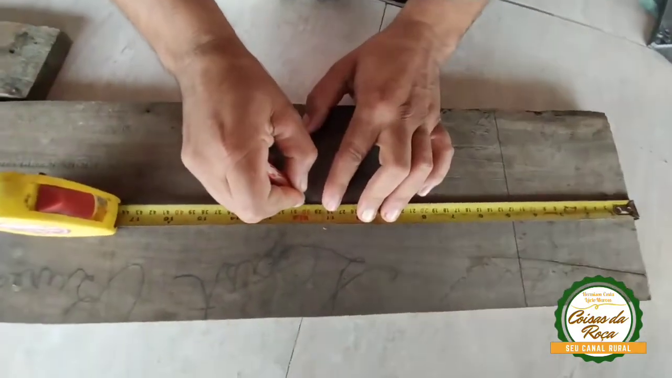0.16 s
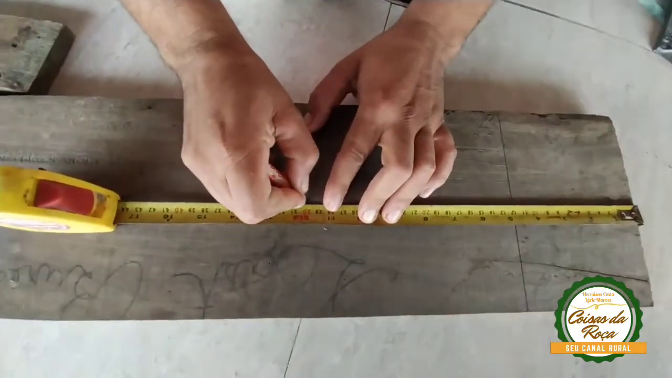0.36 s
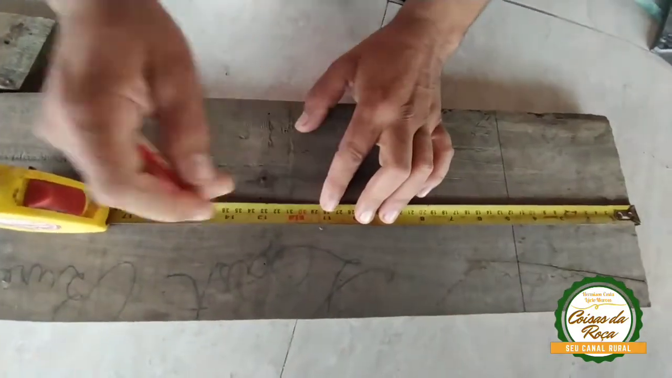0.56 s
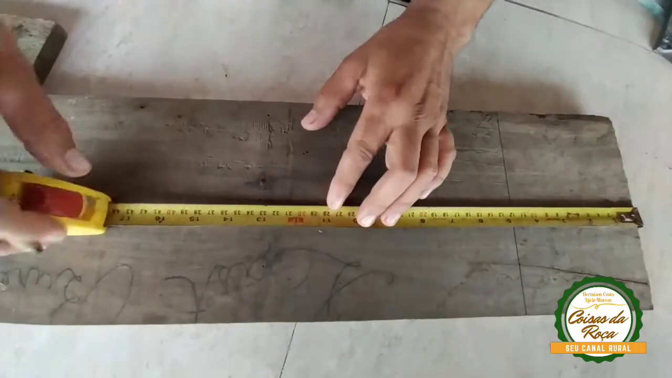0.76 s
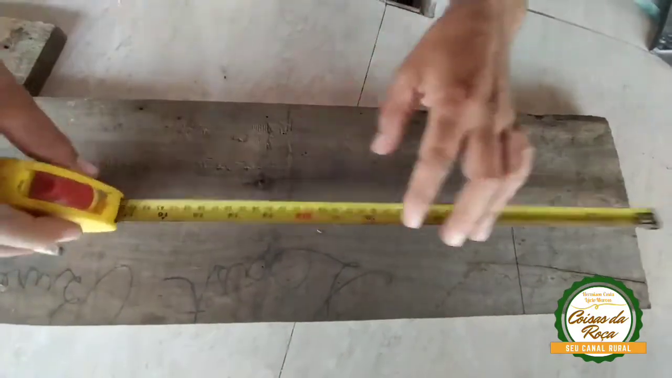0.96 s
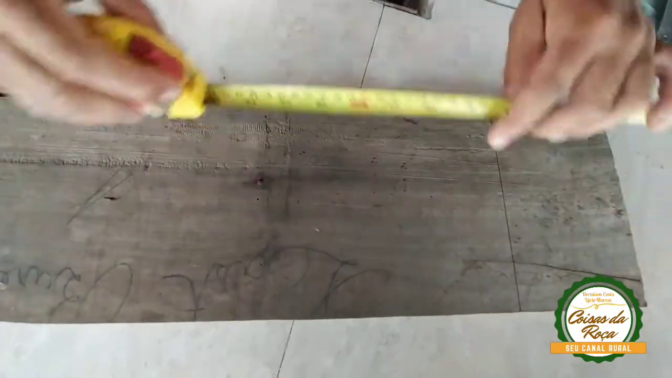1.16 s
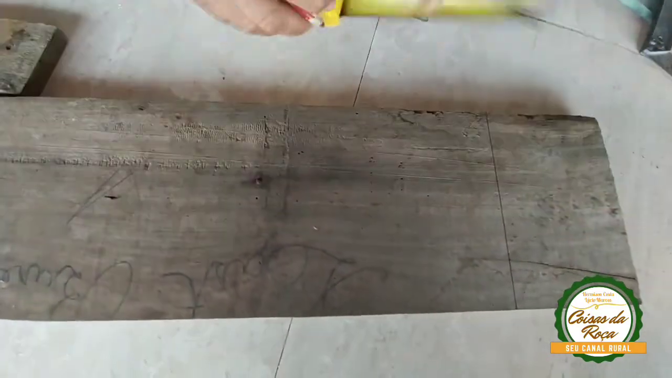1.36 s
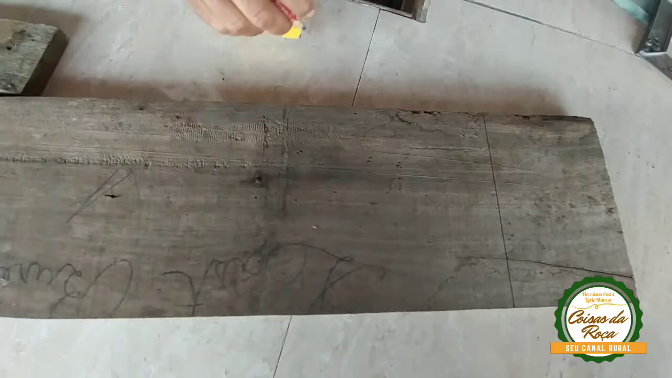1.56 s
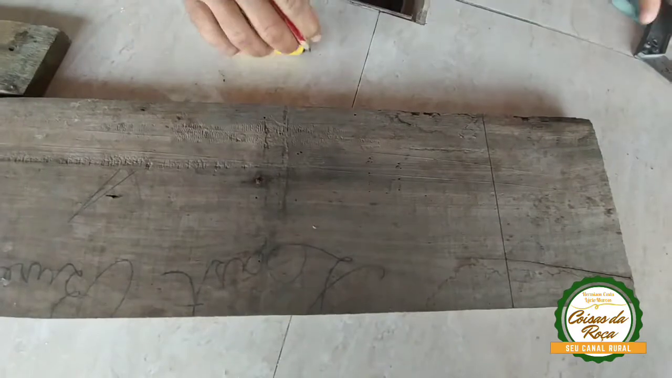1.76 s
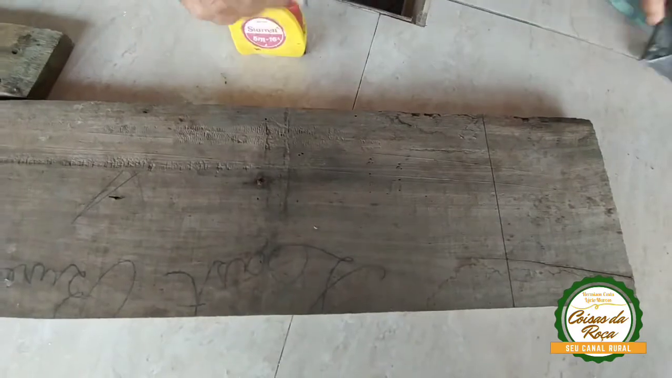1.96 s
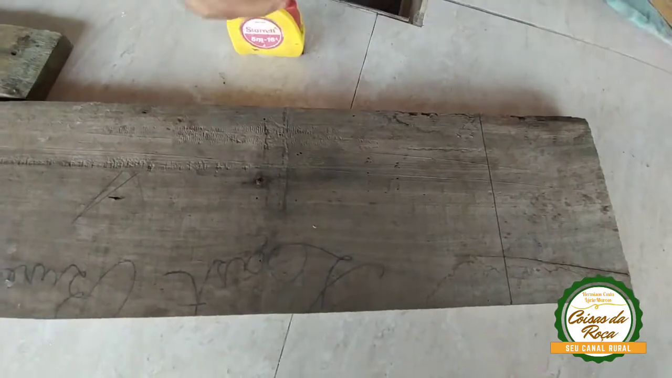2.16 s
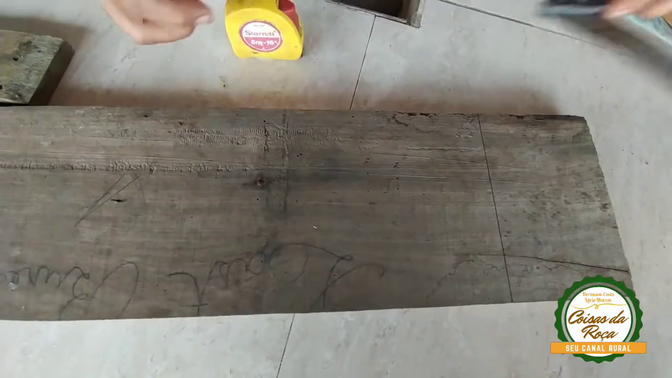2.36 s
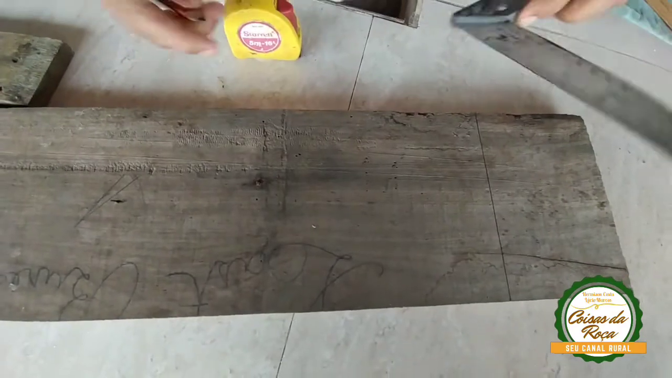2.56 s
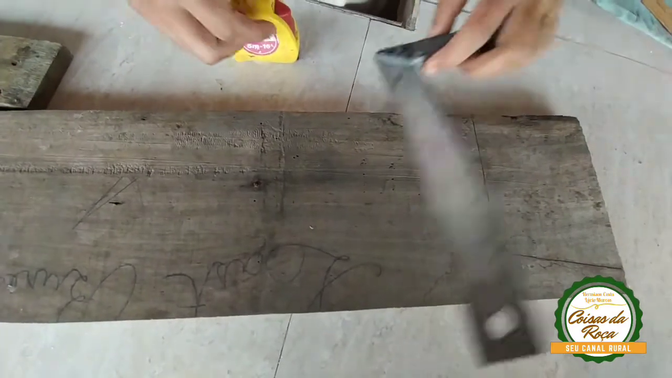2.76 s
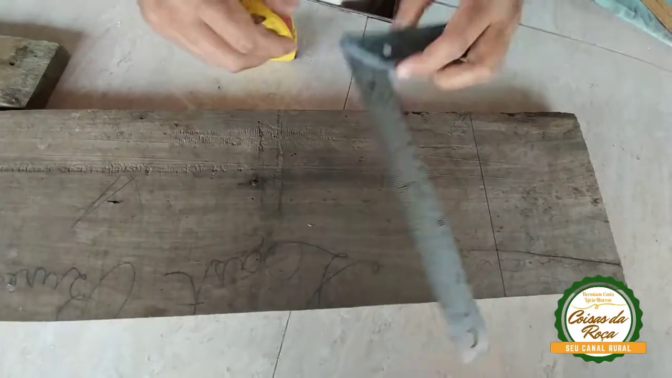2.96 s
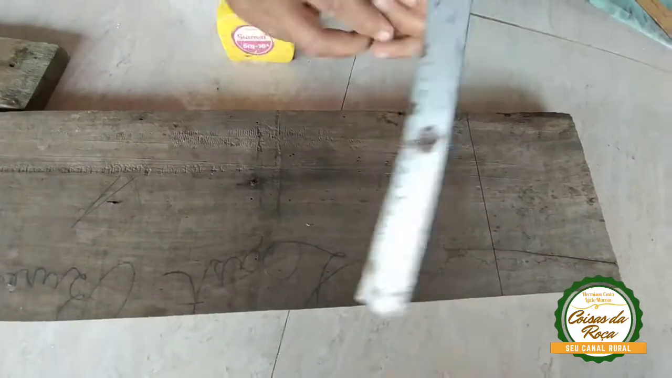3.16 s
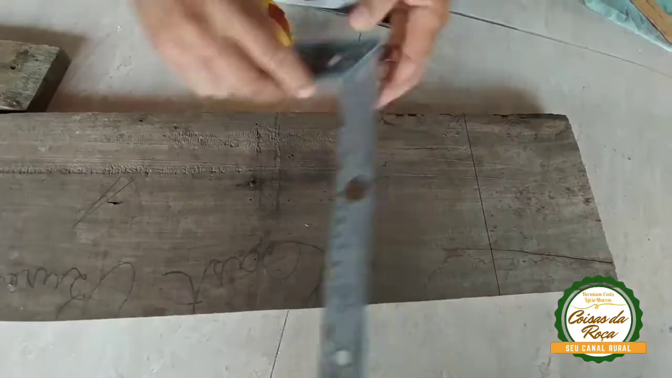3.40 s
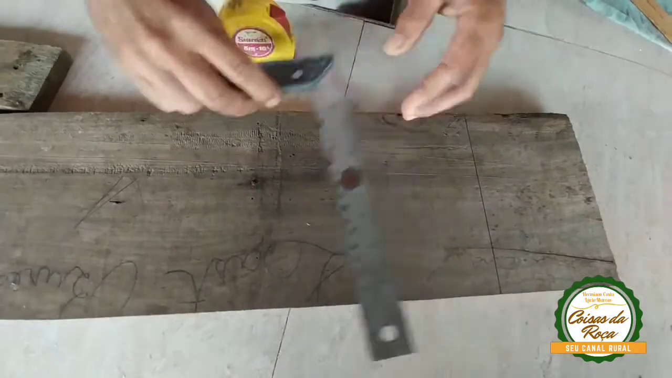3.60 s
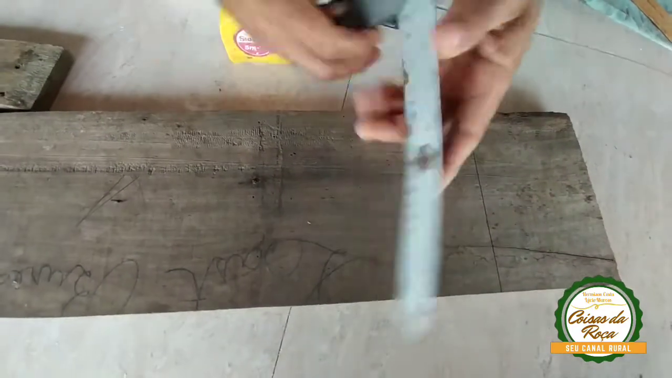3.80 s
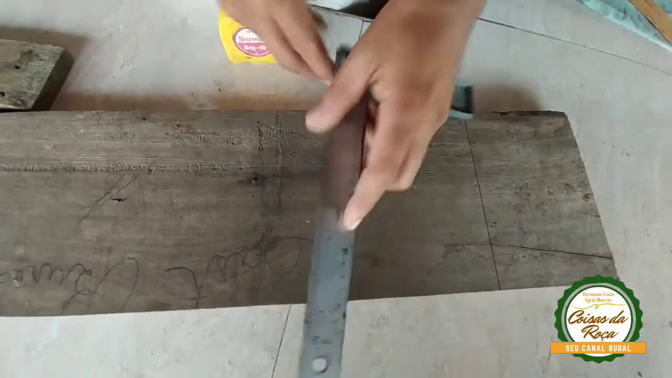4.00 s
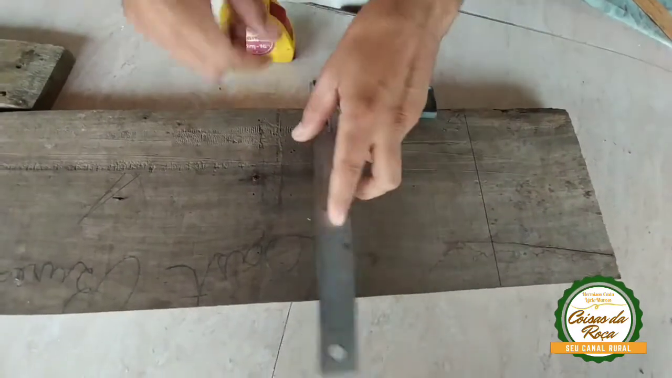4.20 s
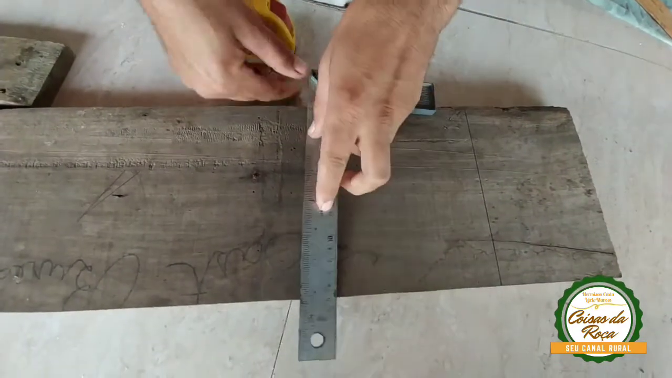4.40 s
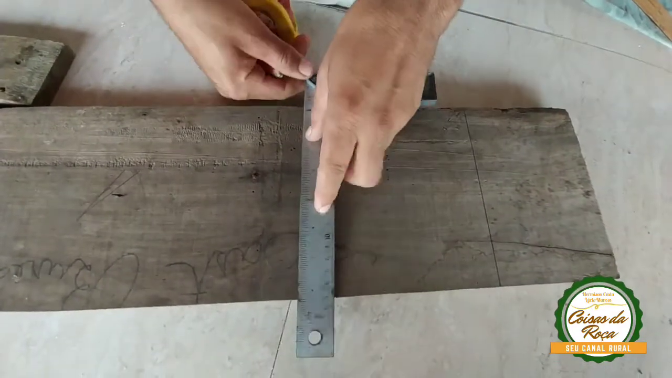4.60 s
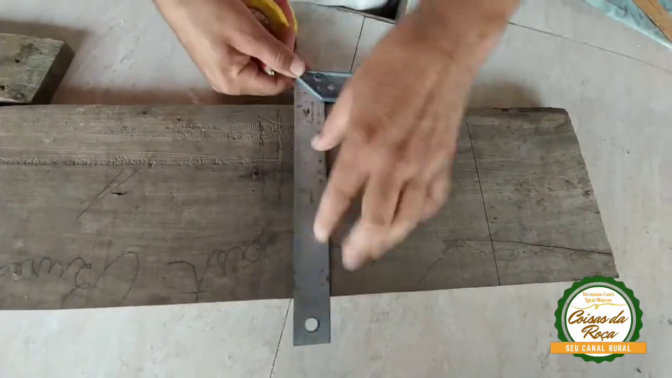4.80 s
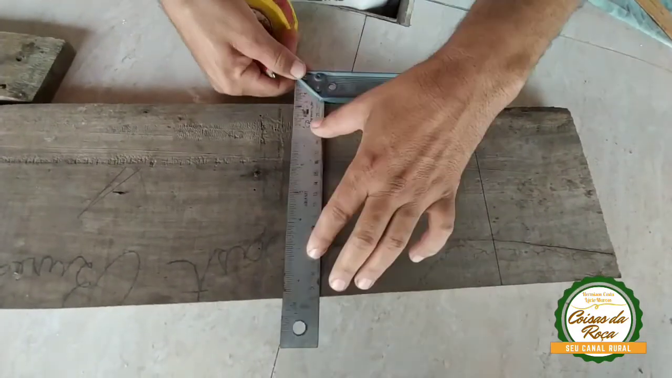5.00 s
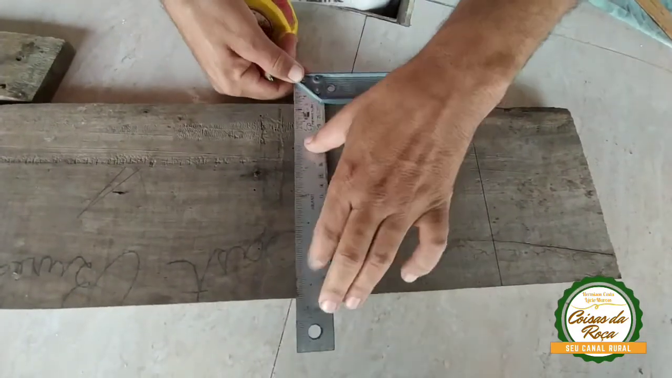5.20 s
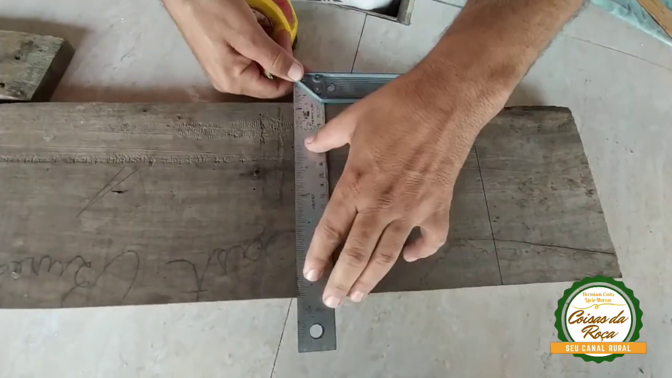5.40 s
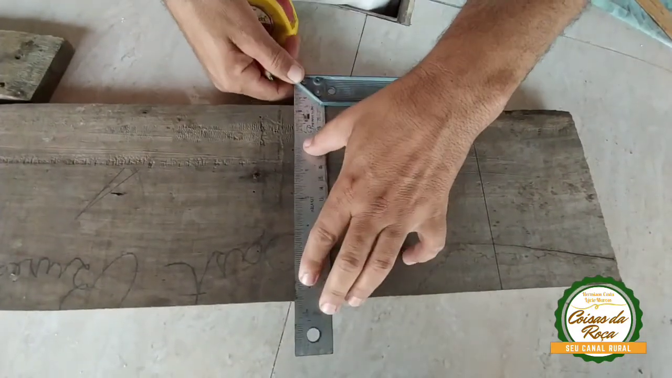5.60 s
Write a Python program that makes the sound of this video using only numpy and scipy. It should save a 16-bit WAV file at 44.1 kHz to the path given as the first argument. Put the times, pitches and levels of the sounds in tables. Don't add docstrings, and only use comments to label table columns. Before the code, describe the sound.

A steel tape clicks loose, rattles fast into its plastic case and snaps home, then a metal square knocks and scrapes on a wooden board.

```python
import sys
import numpy as np
from scipy import signal
from scipy.fft import rfft, irfft
from scipy.io import wavfile
from scipy.ndimage import uniform_filter1d

SR = 44100
rng = np.random.default_rng(int(sys.argv[2]) if len(sys.argv) > 2 else 0)


def digitize_waveform(pressure):
    field = np.atleast_2d(pressure).T
    bounded = np.clip(field, -1, 1)
    quanta = np.round(bounded * 32767).astype(np.int16)
    wavfile.write(sys.argv[1], SR, quanta)


def invert_db(x):
    u = np.asarray(x, float) / 20
    return 10 ** u


N = 249165
T = np.arange(N) / SR

# time_s, level_db
WIND = [(0.0, -59), (0.09, -48.5), (0.12, -52), (0.87, -61), (1.1, -47.5), (1.2, -60), (1.53, -50.5),
        (1.589, -40.5), (1.7, -60), (1.81, -49), (2.42, -66), (2.6, -48), (2.63, -62.5), (3.67, -46.5),
        (4.11, -54), (4.659, -46), (5.46, -51.5), (5.65, -46.5)]
# start_s, peak_db, pitch_hz
EDDIES = [(.083, -38, 174.5), (1.565, -40.5, 261), (1.588, -34.5, 162.7), (2.026, -47, 157),
          (2.589, -46.5, 189), (3.04, -45, 166), (3.14, -44, 145), (3.18, -35.5, 160), (3.345, -52, 181),
          (3.434, -37, 189), (3.469, -34.5, 186), (3.628, -47, 178), (3.66, -49.5, 176.7),
          (3.769, -39.5, 210.7), (3.796, -37.5, 143), (4.665, -31, 172.7), (5.252, -40, 221),
          (5.499, -45, 148)]
# start_s, peak_db, pitch_hz
THUDS = [(1.03, -40.5, 198.5), (1.088, -41.5, 135), (1.45, -48.5, 280), (1.814, -23.5, 205),
         (1.91, -37, 162), (3.911, -39, 238), (4.283, -33, 270), (4.3, -34, 160), (4.408, -36, 240),
         (4.469, -36, 210.8), (4.615, -40, 236), (4.858, -28, 170), (4.952, -30.5, 201), (5.033, -31, 220),
         (5.101, -31, 184), (5.575, -39.5, 182)]
# pitch_hz, level_db (per Hz)
YARD_COLOUR = [(60, -43), (130, -1), (600, -8), (1400, -10), (2400, -5), (6000, -16), (11300, -15.5),
               (12200, -28.5)]
# pitch_hz, width_hz, level_db
MOTOR_HUM = (85.4, 10.6, -70)
# start_s, length_s, second_partial_hz, level_db, shrillness_db
BIRD_CALLS = [(0.235, 0.093, 2376, -67, -7), (0.572, 0.11, 2220, -68, -3), (2.188, 0.049, 2184, -64.5, -8),
              (2.234, 0.12, 2350, -64, -4), (2.447, 0.097, 2240, -66.5, -7), (2.549, 0.13, 2351, -66, -3.5),
              (2.839, 0.13, 2340, -68, 3), (3.142, 0.098, 2327, -66.5, -6.5), (3.262, 0.081, 2090, -72, -6),
              (3.421, 0.14, 2352, -65.5, -6), (3.669, 0.17, 2285, -72, -12),
              (3.759, 0.07, 2252, -61.5, -3.5), (4.546, 0.14, 2353, -65, -1), (5.458, 0.1, 2317, -67, 4.5)]
# multiple (of the lowest pitch), level_db
BIRD_PARTIALS = [(1, -1.5), (2, 10), (3, -1)]

# pitch_hz, width_hz, level_db
GRIT = [(7300, 1130, -6), (9000, 530, 2), (10030, 860, -1), (11070, 650, -6), (12420, 800, -11.5),
        (13450, 800, -17.5), (14760, 1000, -19)]
# pitch_hz, width_hz, level_db
CASE = [(2350, 650, -5), (3306, 413, 0.5), (4013, 390, 0.5), (5260, 1270, -4)]
# pitch_hz, width_hz, level_db
WOOD = [(600, 255, -8.5), (1030, 164, 2), (1434, 520, -3), (1900, 550, 2)]
# time_s, grit_db
REEL = [
    (1.22, -33),
    (1.27, -27.5),
    (1.41, -26),
    (1.45, -28.5),
    (1.52, -26),
    (1.56, -31),
    (1.615, -26.5),
    (1.628, -34),
    (1.748, -48),
]
# peak_s, rise_s (20 dB), fall_s (20 dB), grit_db, dullness_db
TAPE_SCRAPES = [(.879, .002, 0.0242, -45, 10), (.96, .15, 0.33, -51, -3), (1.065, .06, 0.07, -44, -8.5),
                (1.125, .025, 0.45, -44, -16), (1.175, .06, -0.02, -34, -21),
                (1.218, .002, 0.12, -44.5, -3), (1.45, .08, 0.19, -54.5, 8), (1.615, .06, 0.12, -44.5, 0),
                (1.75, .001, 0.0372, -20, -16.5), (1.815, .01, 0.01, -34, -2), (1.83, .01, 0.1, -46, 5.5),
                (1.91, .1, 0.3, -59, -3.5), (1.95, .01, 0.17, -62.5, 13), (2.03, .004, -0.02, -50, 17),
                (2.083, .003, 0.04, -45, -10), (2.11, .04, 0.03, -35.5, -12), (2.15, .03, 0.16, -55.5, -9)]
# peak_s, rise_s (20 dB), fall_s (20 dB), grit_db, dullness_db
SQUARE_SCRAPES = [(3.38, 0.2162, 0.7, -59, -25.5), (3.904, -0.0626, 0.0338, -35, 2.5),
                  (3.93, -0.01, 0.04, -46.5, -0.5), (4.09, 0.066, 0.11, -41, -12.5),
                  (4.115, 0.0258, -0.04, -42, -8), (4.056, 0.02, -0.05, -50, -2),
                  (4.271, -0.04, 0.1718, -52.5, 2), (4.4, -0.0753, 0.06, -42.5, 7.5),
                  (4.455, 0, -0.0333, -56, 21), (4.635, 0.0413, 0.03, -55, 15),
                  (4.68, -0.35, 0.08, -57, -3), (4.803, 0.04, 0.03, -57, -2),
                  (4.85, 0.0054, 0.07, -29.5, 1.5), (4.875, 0.0355, -0.0122, -54, -0.5),
                  (4.96, 0.0443, 0.06, -44.5, 10), (5.026, 0.0045, 0.07, -41, 10.5),
                  (5.08, 0.05, 0.18, -53, -20), (5.2, -0.0274, 0.06, -47, -6),
                  (5.243, 0.05, 0.12, -58.5, 1.5), (5.64, 0.43, 1.5, -69.5, 13)]

# start_s, peak_db, case_share_db, pan_db
HOOK_CLICKS = [(0.8757, -20.5, -3, -11.5), (0.887, -29, -5, -2), (0.9687, -39.5, -25, -14),
               (1.022, -36, -26, -8.5), (1.0406, -22.5, -37, -9), (1.064, -30, -33, -16),
               (1.112, -13.5, -25, -11.5), (1.115, -18, -17, 3), (1.1185, -15.5, -16.5, -23.5),
               (1.136, -26.5, -30.5, 10.5), (1.155, -14.5, -40, -2.5), (1.166, -17.5, -22.5, 7),
               (1.1723, -17, -22, -20)]
# start_s, peak_db, pan_db
SLAPS = [(1.218, -8, -11), (1.221, -9, -3), (1.2223, -9.5, -13), (1.229, -7.5, -7), (1.25, -13, 2),
         (1.26, -12, 0), (1.283, -21, 3), (1.294, -23, -13), (1.3112, -16.5, -8), (1.337, -17, 5.5),
         (1.37, -11.5, -2), (1.373, -13, -1), (1.378, -16, -7), (1.408, -17, -6), (1.41, -13.5, -9),
         (1.421, -27, -4), (1.435, -16, -4.5), (1.4384, -14, 0), (1.561, -16, -5), (1.572, -20, -7),
         (1.577, -20, -3), (1.586, -23, -6), (1.592, -12, -2), (1.603, -16, 0)]
# start_s, peak_db, case_share_db, pan_db
TICKS = [(1.6167, -6, -11, 1), (1.6197, -13.5, -11, -15), (1.748, -19, -18, -16), (1.7518, -21, -9, -6),
         (1.8087, -14, -1, -6.5), (2.079, -30.5, -5.5, 0), (3.5378, -38, -1.5, -4), (4.051, -21, -15, -8.5),
         (4.0628, -20, -14.5, -12.5), (4.084, -13.5, -14, -6.5), (4.097, -30, -10.5, -13),
         (4.844, -25, -7, -7), (4.8691, -14, -16, 0.5), (4.267, -22, -4, -3), (5.0232, -26, 8.5, -11),
         (5.101, -35, -23, -13)]

# start_s, peak_db, pitch_hz, looseness_db, pan_db
KNOCKS = [(0.8768, -24, 2910, -34.5, -6.5), (.8775, -29, 3500, -30, 5), (0.8853, -37, 2860, -30, -6),
          (1.62, -18.5, 823, -30, -4.5), (1.753, -26, 2300, -11, -8), (1.757, -24, 2480, -6, -3.5),
          (1.769, -35.5, 1220, -9, -3), (1.81, -15, 1900, -18, -7), (1.812, -10.5, 1157, -10.5, 1),
          (1.816, -22, 1025, -11, 5), (1.827, -30, 1010, -9, -7), (2.0283, -33, 1125, -23, -6),
          (2.033, -34, 2005, -14, -9), (2.038, -30, 1950, -9, -6), (2.044, -35, 2290, -15, -9),
          (2.05, -36, 1561, -13, -10), (3.905, -22.5, 2140, -21, -14.5), (3.907, -31, 1945, -2, -9),
          (4.2683, -2, 1907, -22.5, 4.5), (4.3956, -22, 1903, -6.5, -4), (4.399, -25, 1900, -13, -6.5),
          (4.408, -35, 1900, -13.5, -6), (4.437, -40, 1520, -23, -7.5), (4.453, -36.5, 2040, -6, -3),
          (4.424, -33, 1850, -28, -9), (4.448, -35.5, 1900, -14.5, -8), (4.609, -33.5, 1950, -12.5, -5),
          (4.631, -29, 1950, -12, -7), (4.801, -51, 1650, 16, -3), (4.8444, -38, 1630, -23, -6),
          (4.8445, -2.5, 1900, -34, 0), (4.958, -30, 2050, -13, -3), (5.024, -25.5, 1030, -3, -1),
          (5.029, -22, 1030, -7, -4), (5.075, -37, 1043, -3, -2.5), (5.073, -33.5, 1860, -5, -6),
          (5.238, -41.5, 1010, -2.5, -2)]
# pitch_hz, level_db, t60_s
STEEL = [(5160, -5.5, 0.17), (5300, -29.5, 0.11), (6700, -19, 0.096), (6990, -7, 0.079), (8320, -11, 0.055),
         (8250, -18, 0.1), (9400, -31.5, 0.065), (9880, -9.5, 0.096), (10800, -3, 0.12), (11070, -6, 0.15),
         (11500, -26.5, 0.09)]
# pitch_hz, level_db, t60_s
BOARD = [(260, -11, 0.029), (384, -25, 0.022), (788, -18, 0.055), (1050, -17.5, 0.07), (1660, -9.5, 0.0223),
         (2520, -5, 0.011), (3070, -9.5, 0.008)]
# pitch_hz, level_db, t60_s
FLAT_SQUARE = [(797, -6.5, 0.16), (990, -9, 0.069), (3025, -4, 0.065), (3740, 7.5, 0.04), (4900, -12, 0.1),
               (7000, -17.5, 0.05)]
# start_s, level_db, pan_db
FLAT_BLOWS = [
    (4.269, -25, 11.5),
    (4.397, -32.5, -7.5),
]
# start_s, peak_db, pitch_hz, pan_db, t60_s
CHIMES = [
    (1.812, -25.5, 920, 2, 0.13),
    (3.906, -30, 1030, -11, 0.055),
    (4.283, -31, 435, 8, 0.023),
    (4.406, -43, 3770, -15, 0.25),
    (4.804, -41, 4040, -13, 0.069),
    (4.868, -21.5, 4031, -12, 0.11),
    (.885, -50.5, 367, -5, 0.36),
    (1.617, -10, 5080, 10, .015),
    (4.955, -33, 1595, -5, 0.11),
    (5.101, -35, 7900, -15, 0.015),
]

# pitch_hz, level_db, t60_s
COIL = [(8180, 0.5, 0.052), (8600, 0.5, 0.08), (9240, -5, 0.0376), (9520, 3, 0.042), (9010, -2, 0.0495),
        (9720, 8, 0.038), (10050, -19, .05), (10100, -6, 0.056), (11000, -6, 0.075), (10700, 1, 0.055),
        (3326, -8, 0.046), (5310, -3.5, 0.058), (7900, -19, 0.021)]
# pitch_hz, level_db, t60_s
SHELL = [(4363, -8, 0.032), (4650, -11, 0.034), (5500, -9.5, 0.04), (6900, -12, 0.045), (9570, -5, 0.066),
         (10200, -5.5, 0.046), (10730, -4, 0.057), (11330, -3.5, 0.037), (11900, -6, 0.041),
         (13030, -14, 0.056)]
# pitch_hz, level_db, t60_s
SQUARE_EDGE = [(2140, -5, .05), (5230, -13, .07), (6740, -14, 0.095), (7320, -8, 0.088), (8150, -11.5, .06),
               (9400, -21, 0.053), (9700, -21, 0.058), (10800, -5.5, 0.12), (11020, 1.5, 0.038),
               (11430, -2, 0.046), (12230, -17, .05)]
# pitch_hz, level_db, t60_s
PLANK = [(843, -6.5, 0.11), (1030, -4, 0.046), (1623, -4, 0.057), (1845, -16, 0.053), (1950, -1, 0.068),
         (2160, 2, 0.044), (2410, -7.5, 0.1), (2760, -10, 0.027), (3120, -11, 0.042), (3730, -9, .08),
         (3940, -4.5, 0.053)]
# pitch_hz, level_db, t60_s
SPRING = [(510, -25, 0.037), (574, 1, 0.073), (636, 2.5, 0.058), (773, -1.5, 0.044), (970, -14, 0.035),
          (1133, -2, 0.082)]
# start_s, length_s, start_db, end_db, pan_db
COIL_DRAGS = [
    (1.225, 0.119, -36, -32, 1),
    (1.365, 0.072, -29.5, -35, -1),
    (1.445, .16, -30, -44, -5),
    (1.752, 0.061, -39, -48, -2),
]
# start_s, length_s, start_db, end_db, pan_db
SHELL_DRAGS = [
    (2.04, 0.027, -40.5, -42.5, 0),
    (2.081, 0.034, -30, -38.5, 0),
    (2.11, 0.055, -37, -51, 0),
]
# start_s, length_s, start_db, end_db, pan_db
EDGE_DRAGS = [
    (4.846, 0.021, -25.5, -21.5, 1),
    (4.87, 0.058, -27.5, -53, 1.5),
    (5.025, 0.048, -51, -49, -1),
]
# start_s, length_s, start_db, end_db, pan_db
PLANK_DRAGS = [
    (2.027, .03, -41, -40, -4),
    (4.85, 0.074, -32.5, -41.5, 2),
    (4.945, .02, -36.5, -27.5, -6),
    (4.962, 0.045, -35, -48, -7),
    (5.025, 0.026, -33.5, -40, -12),
    (5.068, .04, -42.5, -53, -10),
    (5.205, 0.043, -48.5, -48, -11),
]
# start_s, length_s, start_db, end_db, pan_db
SPRING_DRAGS = [
    (.878, 0.013, -40, -42, 0),
    (1.4, 0.066, -54, -42.5, 0.5),
    (1.46, .15, -59, -49, 0),
    (1.815, 0.077, -52, -55, 0),
    (2.026, 0.046, -43.5, -53, 1),
]
# pitch_hz, t60_s, level_db
PORCH = [(257, 0.45, -23.5), (860, 0.15, -62), (2520, 0.21, -29.5), (4040, 0.25, -27.5), (9700, 0.089, -17)]


def band(x, hz, width):
    b, a = signal.iirpeak(hz, hz / width, fs=SR)
    return signal.lfilter(b, a, x)


def steep(x, hz, width):
    return band(band(x, hz, 2.6 * width), hz, 2.6 * width)


def high_pass(x, hz):
    return signal.sosfilt(signal.butter(2, hz, "high", fs=SR, output="sos"), x)


def unit(x):
    return x / np.sqrt(np.mean(x ** 2))


def decay(t, t60):
    return 1000. ** (-t / t60)


def walk(rate):
    hold = int(SR / rate)
    steps = np.repeat(rng.standard_normal(N // hold + 1), hold)
    return unit(uniform_filter1d(uniform_filter1d(steps, hold), hold)[:N])


def add(out, s, sound, pan_db):
    i = int(s * SR)
    sound = sound[..., :N - i]
    out[:, i:i + sound.shape[-1]] += invert_db(np.array([[pan_db], [-pan_db]]) / 2) * sound


def body(x, peaks, patchy_db=0):
    click = np.eye(1, 2048)[0]
    response, out = 0, 0
    for k, (hz, width, db) in enumerate(peaks):
        sign = (-1) ** k
        response = response + sign * invert_db(db) * steep(click, hz, width)
        out = out + sign * invert_db(db + patchy_db * walk(30)) * steep(x, hz, width)
    return out / np.linalg.norm(response)


def modes(table, ring, scatter_db):
    t, (hz, db, t60) = T[:SR // 4, None], np.transpose(table)
    grip = rng.standard_normal((2, len(hz)))
    tones = np.sin(2 * np.pi * hz * (1 + 0.0137 * grip[1]) * t)
    return (invert_db(db + scatter_db * grip[0]) * tones * decay(t, ring * t60)).sum(axis=1)


def wind():
    s, db = np.transpose(WIND)
    pan_db = -3 - 1.96 * np.maximum(db + 51.5, 0)
    lean_db = np.interp(T, s, pan_db) * np.array([[.5], [-.5]])
    noise = rng.standard_normal((2, N)) + 1.1 * rng.standard_normal(N)
    low = signal.butter(3, [14, 90], "band", fs=SR, output="sos")
    rumble = unit(signal.sosfilt(low, noise))
    out = rumble * invert_db(np.interp(T, s, db) + lean_db + 2.8 * walk(12) - 1.0)

    t = T[:SR // 8]
    pops = [(*row, -21.5) for row in EDDIES] + [(*row, 2) for row in THUDS]
    for s, db, hz, pan_db in pops:
        age = t * hz / 3.58
        falling_hz = hz * (0.827 + .5 * np.exp(-2.1 * age))
        phase = 2 * np.pi * (np.cumsum(falling_hz) / SR + rng.random())
        swell = 3.905 * age * np.exp(1 - 3.64 * age)
        add(out, s - .004, invert_db(db - 4.0) * swell * np.sin(phase), pan_db)
    return out


def yard():
    hz, db = np.transpose(YARD_COLOUR)
    f = np.fft.rfftfreq(N, 1 / SR) + 1
    colour = invert_db(np.interp(np.log(f), np.log(hz), db))
    shared = np.clip(1 - f / 1200, 0, 1)
    noise = rfft(rng.standard_normal((2, N))) + 1.8 * shared * rfft(rng.standard_normal(N))
    hiss = unit(irfft(noise * colour / np.sqrt(1 + (1.94 * shared) ** 2), N))
    hum_hz, hum_width, hum_db = MOTOR_HUM
    hum = invert_db(hum_db) * unit(steep(rng.standard_normal(N), hum_hz, hum_width))
    return hum + hiss * invert_db(-54.5 + .4 * walk(2) + np.array([[-.8], [.8]]))


def birds():
    out = np.zeros((2, N))
    waver = 1 + .014 * walk(70)
    hoarse = invert_db(4.0 * np.array([walk(90), walk(90)]))
    for s, length, hz, db, shrill_db in BIRD_CALLS:
        age = np.linspace(0, 1, int(length * SR))
        span = slice(int(s * SR), int(s * SR) + len(age))
        sag = 1 - 0.02432 * age
        arch = 1 + 0.0287 * (np.sin(np.pi * age) - .7)
        phase = np.pi * np.cumsum(hz * sag * arch * waver[span]) / SR
        call = sum(invert_db(level) * np.sin(k * phase) for k, level in BIRD_PARTIALS)
        call += invert_db(shrill_db + 2.5) * (np.sin(4 * phase) + 0.79 * np.sin(5 * phase))
        add(out, s, invert_db(db + 2.5) * call * np.sin(np.pi * age) ** 0.25 * hoarse[:, span], -3.5)

    flock = unit(steep(rng.standard_normal((2, N)), 2300, 120))
    out += invert_db(-72.5 + 7.2 * walk(7.9)) * flock
    t = T[:SR // 4]
    echoes = rng.standard_normal((2, len(t))) * decay(t, 0.31)
    echoes /= np.linalg.norm(echoes[0])
    return 0.31 * out + signal.fftconvolve(out, echoes, axes=1)[:, :N]


def slides():
    gains = np.zeros((3, 2, N))
    s, db = np.transpose(REEL)
    t = T[int(s[0] * SR):int(s[-1] * SR)]
    for gain, share_db in zip(gains, [0, -12.5, -51]):
        add(gain, s[0], invert_db(np.interp(t, s, db) + share_db), -2.5)
    air = invert_db(np.interp(T, s, db, left=-99, right=-99) - 15 + 3.5 * walk(60))
    out = air * unit(steep(rng.standard_normal((2, N)), 13860, 1800))

    for table, case_db, pan_db in [(TAPE_SCRAPES, -2, -3.5), (SQUARE_SCRAPES, 4, -2.5)]:
        for s, rise, fall, db, dull_db in table:
            rise, fall = max(rise, 1 / 2000), max(fall, 1 / 200)
            t = np.arange(-2 * rise, 2 * fall, 1 / SR)
            shape = invert_db(db - 20 * np.where(t < 0, -t / rise, t / fall))
            for gain, share_db in zip(gains, [0, case_db + 0.28 * dull_db, dull_db]):
                add(gain, s + t[0], invert_db(share_db) * shape, pan_db)

    for gain, peaks, shared in zip(gains, [GRIT, CASE, WOOD], [.3, .4, 1.2]):
        catch_sizes = invert_db(5.3 * np.minimum(rng.exponential(size=N), 3))
        catches = (rng.random(N) < 300 / SR) * catch_sizes
        grip = unit(3.5 + signal.lfilter([1], [1, -np.exp(-1 / (0.0044 * SR))], catches))
        noise = rng.standard_normal((2, N)) + shared * rng.standard_normal(N)
        out = out + body(gain * grip * unit(noise), peaks, patchy_db=2.2)

    t = T[:SR // 8]
    shimmer = rng.standard_normal((2, len(t))) * decay(t, 0.046)
    shimmer *= invert_db(-4.5) / np.linalg.norm(shimmer[0])
    return 0.816 * out + signal.fftconvolve(out, shimmer, axes=1)[:, :N]


def clicks():
    grit, case = np.zeros((2, 2, N))
    t = T[:2048]
    rows = [(*row, 0.00207) for row in HOOK_CLICKS] + [(*row, 0.0015) for row in TICKS]
    for s, db, pan_db in SLAPS:
        length = 0.0012 + 0.0022 * (s - SLAPS[0][0])
        rows.append((s, db, -23, pan_db, length))
    for s, db, case_db, pan_db, length in rows:
        noise = rng.standard_normal((2, len(t)))
        burst = (noise[0] + 0.63 * noise) * t / length * np.exp(1 - 1.53 * t / length)
        add(grit, s, invert_db(db - 5.0) * burst, pan_db)
        add(case, s, invert_db(db + case_db + 3.0) * burst, pan_db)
    bare_crack = invert_db(-17.5) * high_pass(grit, 12000)
    return body(grit, GRIT) + body(case, CASE) + bare_crack


def knocks():
    out, t = np.zeros((2, N)), T[:SR // 4]
    for s, db, hz, loose_db, pan_db in KNOCKS:
        t60 = 0.011 + 0.085 * invert_db(2 * min(loose_db, 0))
        note = np.sin(2 * np.pi * hz * t) * (1 - np.exp(-t / 0.00021)) * decay(t, t60)
        chatter = rng.standard_normal(1024) * np.exp(-t[:1024] / 0.0035)
        chatter /= np.linalg.norm(chatter)
        board = invert_db(-12.5) * modes(BOARD, ring=0.74, scatter_db=4.0)
        steel = modes(STEEL, ring=0.38, scatter_db=1.5) * (s > 3)
        ring = signal.fftconvolve(board + invert_db(loose_db - 9.0) * steel, chatter)[:len(t)]
        crack = steep(chatter, 5500, 4000) * np.exp(-t[:1024] / .001)
        ring[:1024] += invert_db(min(loose_db, 0) + 8) * crack
        add(out, s, invert_db(db + 6) * (note + ring), pan_db)

    rings = list(CHIMES)
    for s, db, pan_db in FLAT_BLOWS:
        rings += [(s, db + mode_db, hz, pan_db, t60) for hz, mode_db, t60 in FLAT_SQUARE]
    for s, db, hz, pan_db, t60 in rings:
        tone = np.sin(2 * np.pi * hz * t) * (1 - np.exp(-t / 0.0001)) * decay(t, t60)
        add(out, s, invert_db(db) * tone, pan_db)
    return high_pass(out, 200)


def drags():
    out = np.zeros((2, N))
    pairs = [(COIL_DRAGS, COIL), (SHELL_DRAGS, SHELL), (EDGE_DRAGS, SQUARE_EDGE),
             (PLANK_DRAGS, PLANK), (SPRING_DRAGS, SPRING)]
    for rows, table in pairs:
        t, (hz, db, t60) = T[:SR // 8, None], np.transpose(table)
        ring = (invert_db(db) * np.sin(2 * np.pi * hz * t) * decay(t, t60)).sum(axis=1)
        ring /= np.linalg.norm(ring)
        for s, length, from_db, to_db, pan_db in rows:
            count = int(length * SR)
            strength = np.repeat(rng.exponential(size=count), 64)[:count]
            catches = rng.standard_normal((2, count)) * invert_db(4.0 * np.minimum(strength, 3))
            push = unit(catches) * invert_db(np.linspace(from_db, to_db, count))
            add(out, s, signal.fftconvolve(push, ring[None], axes=1), pan_db)
    return out


def porch(near):
    t = T[:SR // 2]
    tail = np.zeros((2, len(t)))
    for hz, t60, db in PORCH:
        noise = unit(band(rng.standard_normal((2, len(t))), hz, 0.5 * hz))
        tail += invert_db(db) * noise * decay(t, t60)
    tail *= np.clip((t - .003) / 0.00032, 0, 1) * invert_db(-25.5)
    return signal.fftconvolve(near, tail, axes=1)[:, :N]


def scene():
    near = slides() + clicks() + knocks() + drags()
    near[0] = np.roll(near[0], 5)
    return wind() + yard() + birds() + near + porch(near)


def thin_weak_bands(x, weak_db, top_db):
    f, _, z = signal.stft(x, SR, window="cosine", nperseg=1024)
    z = z.copy()
    f = f[:512].reshape(-1, 4).mean(axis=1)[:, None]
    power = (np.abs(z[:, :512]) ** 2).sum(axis=0).reshape(128, 4, -1).mean(axis=1) + 1e-18
    db = 10 * np.log10(power)
    luck = 5.5 * uniform_filter1d(rng.standard_normal(db.shape), size=6, axis=1)
    neighbours = uniform_filter1d(db, size=9, axis=0)
    weak = (f > 3300) & (f < 8300) & (db + luck < neighbours - weak_db)
    treble = db[(f[:, 0] > 8500) & (f[:, 0] < 11000)].mean(axis=0)
    mids = db[(f[:, 0] > 1000) & (f[:, 0] < 4000)].mean(axis=0)
    treble = np.maximum(treble, mids - 8.0)
    top = (f > 11400) & (db + luck < treble - top_db + 9 * (f > 15700))
    z[:, :512] *= np.repeat(~(weak | top), 4, axis=0)
    return signal.istft(z, SR, window="cosine", nperseg=1024)[1][:, :N]


def low_pass(x):
    return signal.sosfilt(signal.butter(12, 16800, fs=SR, output="sos"), x)


def record(dry):
    rounded = dry / (1 + (dry / .97) ** 6) ** (1 / 6)
    thinned = thin_weak_bands(rounded, weak_db=4.5, top_db=15)
    return low_pass(thinned)


dry = scene()
out = record(dry)
digitize_waveform(out)
```